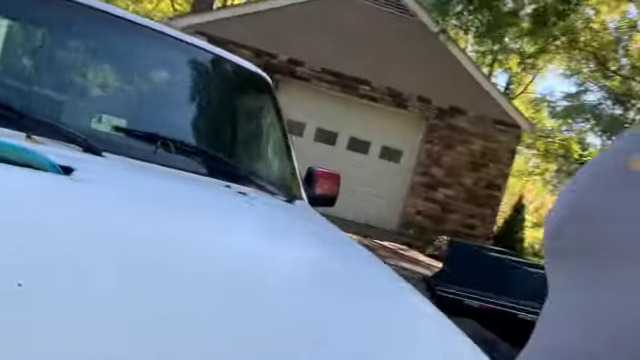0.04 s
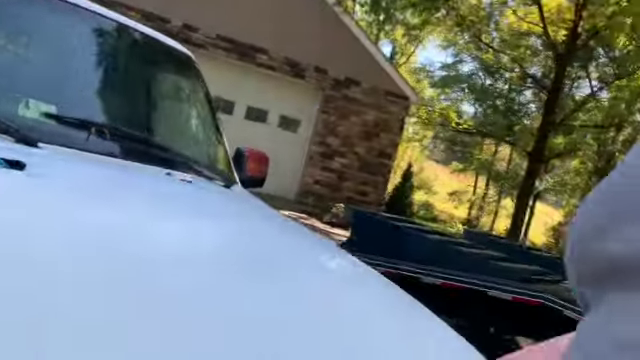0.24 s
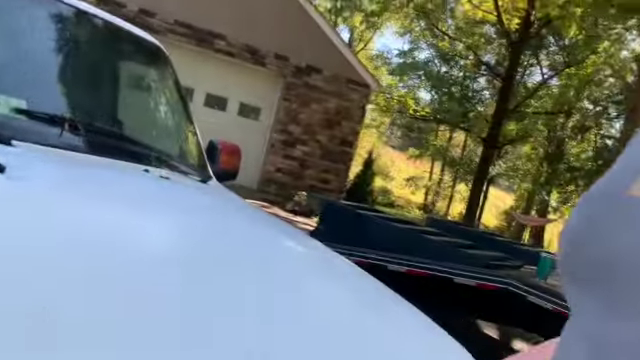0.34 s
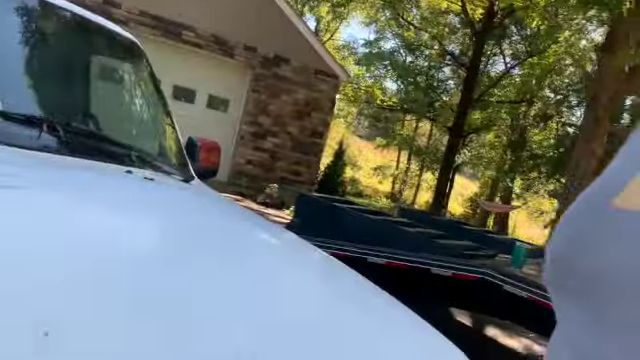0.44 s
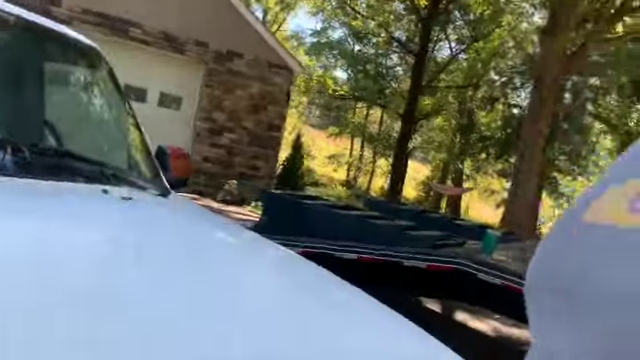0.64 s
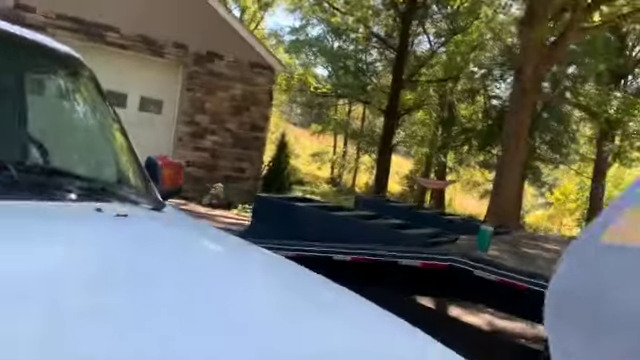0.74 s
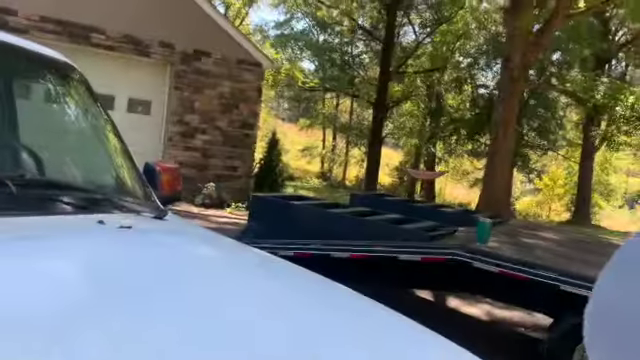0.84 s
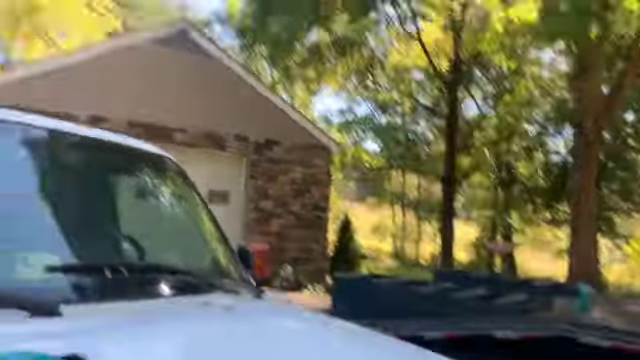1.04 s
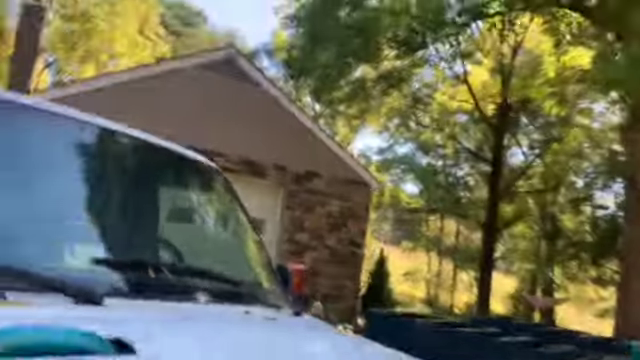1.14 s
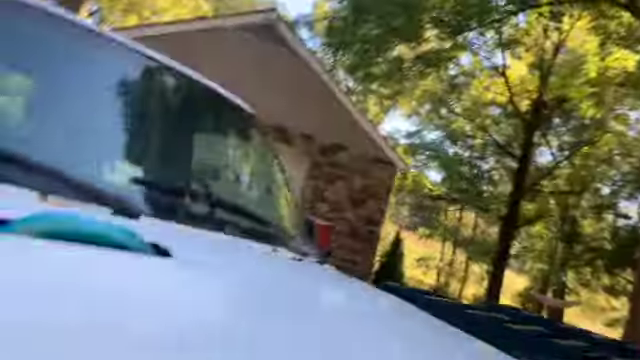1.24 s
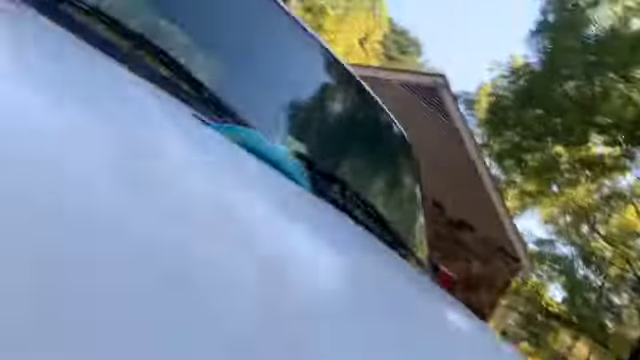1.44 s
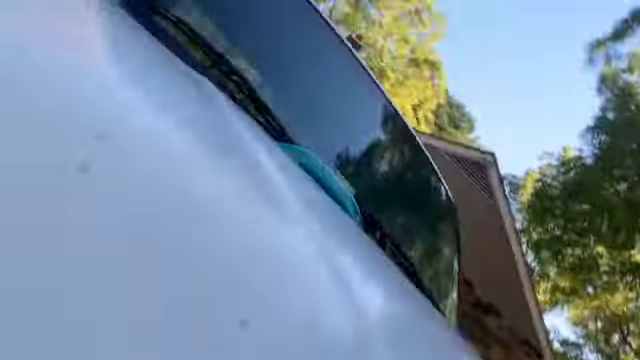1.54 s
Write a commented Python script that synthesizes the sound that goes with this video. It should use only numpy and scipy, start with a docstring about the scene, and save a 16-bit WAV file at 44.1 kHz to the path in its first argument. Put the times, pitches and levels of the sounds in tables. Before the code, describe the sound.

Close to the microphone on a driveway, a truck hood clunks open after a slight sleeve rustle. The safety catch clacks back, the rising panel judders, and its struts hiss faintly among a few soft knocks.

```python
"""A pickup's hood is unlatched and lifted on a driveway, an arm's length from the microphone.
A sleeve rustles among small ticks and handling rumble. The striker scrapes free of the latch in a run of
ringing blows, the hood jumps with a boom and the safety catch snaps back. The wide steel panel shudders
and buzzes as it starts to rise, then its gas struts hiss and whistle. Soft bumps follow, and near the
top of the swing the hinge begins to scrape."""
import sys
import numpy as np
from scipy.fft import rfft, irfft, next_fast_len
from scipy.io import wavfile
from scipy.ndimage import map_coordinates

SR = 44100
rng = np.random.default_rng(int(sys.argv[2]) if len(sys.argv) > 2 else 0)


def store_pcm(level_fs):
    """Save levels as 16-bit WAV."""
    pcm = np.round(np.clip(level_fs, -1, 1) * 32767).astype(np.int16)
    wavfile.write(sys.argv[1], SR, np.atleast_2d(pcm).T)


N = 70560
T = np.arange(N) / SR

# stereo image of all the noise (frequency [Hz], left-right likeness [0 to 1])
STEREO_LIKENESS = [(100, 0.88), (180, 1), (330, 0.31), (1000, 0.087), (2500, 0), (8000, 0)]
# outdoor air bed (frequency [Hz], relative level [dB])
AIR_COLOUR = [(30, 14), (200, -5.5), (600, -9.5), (1300, -14), (3000, -25), (9000, -29.5), (11500, -37),
              (14000, -38.5)]
# rumble of the handled hood (time [s], level [dB]) and (frequency [Hz], relative level [dB])
RUMBLE_LEVEL = [(0, -49), (.05, -61.5), (.11, -41.5), (.17, -39.5), (.205, -37), (.24, -31), (.35, -32.5),
                (.55, -36), (.7, -43), (.8, -48.5), (.92, -46.5), (1.02, -48.5), (1.09, -51.5), (1.19, -45),
                (1.28, -53.5), (1.38, -53), (1.5, -47.5), (1.6, -46)]
RUMBLE_COLOUR = [(20, -36), (40, -11.5), (65, 2.5), (100, -1.5), (135, -1), (175, -3.5), (220, -11.5),
                 (420, -16.5), (650, -25.5), (1300, -34), (2500, -43.5), (6000, -62)]
# sleeve rustle (time [s], level [dB]) and (frequency [Hz], relative level [dB])
SLEEVE_LEVEL = [(0, -66), (.06, -63.5), (.115, -58), (.17, -70), (.36, -58.5), (.41, -52.5), (.47, -71),
                (.93, -74.5), (1.01, -57), (1.07, -60), (1.17, -69), (1.25, -63.5), (1.32, -68.5),
                (1.37, -75.5), (1.6, -81)]
SLEEVE_COLOUR = [(300, -12), (1000, 3.5), (2500, 6), (4500, 4), (8500, 1.5), (10000, -7), (12000, -24.5)]
# small sharp ticks (time [s], level [dB], centre [Hz])
TICKS = [(0.018, -60, 7300), (.058, -47.5, 5030), (0.446, -54, 7830), (1.01, -53, 7400),
         (1.2334, -43.5, 6640), (1.318, -60, 6500), (1.555, -59, 5060)]
# booms of the whole panel (time [s], level [dB], pitch [Hz], t60 [s])
BOOMS = [(0.086, -27.5, 99.7, 0.16), (0.131, -32.5, 124, 0.14), (0.179, -22, 93, .045),
         (0.2542, -3.5, 101.1, 0.1), (0.2753, -14, 92.9, 0.18), (0.3062, -11.5, 96.7, 0.14),
         (.352, -25.5, 135, 0.26), (0.743, -36.5, 181, 0.16), (0.878, -28.5, 79, 0.076),
         (.912, -34, 92.7, 0.28), (1.005, -40, 84, 0.24), (1.152, -27.5, 87.6, .15),
         (1.165, -28, 58.6, 0.25), (1.275, -30, 76.7, 0.18), (1.48, -43.5, 107, 0.46)]
# the five points that shape the tone of a blow (frequency [Hz])
BLOW_BANDS_HZ = [300, 1500, 3500, 8000, 11000]
# the striker leaving the latch (time [s], then relative level [dB] at each of BLOW_BANDS_HZ)
STRIKER_BLOWS = [(.154, -34, -44, -59, -82, -91), (.209, -33, -26.5, -36.5, -48.5, -82),
                 (.232, -26, -22.5, -42.5, -54, -79), (.238, -24, -26.5, -32.5, -63, -70),
                 (.246, -35, -25.5, -41, -48.5, -73)]
# ring of the hood at the striker (frequency [Hz], relative level [dB], t60 [s])
HOOD_MODES = [(241, -2, 0.84), (356, 2, 0.18), (400.4, 0, 0.42), (518, -10, 0.35), (606, -11, 0.33),
              (751, -11.5, 0.52), (859.4, -5.5, 0.26), (1044, -10.5, 0.65), (1238, -14, 0.57),
              (1576, -28, 0.13), (1770, -8.5, 0.17), (2372, -5.5, .16), (2507, -11, 0.23),
              (2800, -6.5, 0.21), (3864, -12, 0.32), (4080, -1.5, 0.067)]
# dense clatter between the modes (frequency [Hz], relative level [dB]) and (frequency [Hz], t60 [s])
CLATTER_BANDS = [(175, -7.5), (300, -3.5), (620, -10), (1000, -6.5), (1500, -5), (2300, -3), (3300, -4),
                 (5000, -2), (8500, 4), (11000, -2.5)]
CLATTER_DECAY = [(200, 0.3), (1300, 0.27), (3500, 0.14), (8000, 0.084)]
# the safety catch snapping back (time [s], then relative level [dB] at each of BLOW_BANDS_HZ)
CATCH_BLOWS = [(.3275, -24.5, -26, -37.5, -41, -45), (.330, -29.5, -25, -47.5, -54, -62),
               (.349, -29, -36, -70, -76, -65)]
# ring of the catch (frequency [Hz], relative level [dB], t60 [s])
CATCH_MODES = [(325, -3.5, 0.36), (522, -8.5, 0.75), (645.7, -12, 0.17), (772, -8, 0.06), (844.5, -9.5, .2),
               (889, -4, 0.12), (1039, -15.5, 0.54), (1181, -3.5, .25), (1320, -9, 0.34), (1330, 1, 0.15),
               (1432, -0.5, 0.12), (1602, 3, 0.062), (1783, 1, 0.079), (2240, 5, 0.11), (2830, -7, 0.093),
               (6590, -11, 0.33)]
# soft knocks of latch, hinge and hands (time [s], level [dB], pitch [Hz])
KNOCKS = [(.3492, -18, 771), (0.802, -73, 258), (0.886, -41, 385), (0.923, -46.5, 1050), (.93, -44.5, 383),
          (0.994, -38.5, 413), (1.014, -37.5, 393), (1.149, -38.5, 330), (1.167, -34, 233),
          (1.188, -36.5, 200), (1.222, -46, 430)]
# shudder of the rising hood (time [s], level [dB])
SHUDDER_LEVEL = [(.38, -63), (.40, -34), (.445, -26.5), (.475, -24), (.51, -19), (.57, -18.5), (.61, -26.5),
                 (.65, -31), (.72, -40.5), (.8, -49), (.9, -60)]
# higher panel modes that the shudder shakes (frequency [Hz], level against the lowest mode [dB])
PANEL_MODES = [(175, -11), (240, -27), (266, -29.5), (316, -30), (360, -31), (398, -38), (436, -34),
               (524, -34)]
# loose metal buzzing on the panel (time [s], level [dB]) and (frequency [Hz], relative level [dB])
BUZZ_LEVEL = [(.38, -67), (.44, -59.5), (.48, -40), (.515, -37), (.55, -42), (.59, -55.5), (.68, -77),
              (.8, -62)]
BUZZ_COLOUR = [(150, -11), (300, 5), (520, -7.5), (720, -9.5), (1100, -4.5), (1350, -3), (1530, -4.5),
               (1800, -14), (2500, -22), (2950, -17), (3500, -26.5), (6000, -39), (11000, -59.5)]
# hiss of the gas struts, and their thin high jet (frequency [Hz], relative level [dB])
HISS_COLOUR = [(200, -28), (700, -12), (1300, 5), (2000, 3), (2900, 2.5), (3350, 0), (3800, 8),
               (4150, 12.5), (4700, 1.5), (5500, -2), (7300, -12), (10000, -48)]
JET_COLOUR = [(7000, -52), (7900, -22.5), (8100, 1), (8700, -5.5), (9600, -13), (11000, -21.5)]
# strut whistles (start [s], end [s], first pitch [Hz], last pitch [Hz], level [dB], roughness [rad])
WHISTLES = [(0.584, 0.723, 2496, 2374, -61, 0.22), (0.768, 0.87, 2370, 2320, -64, 0.64)]
# hinge scrape (frequency [Hz], relative level [dB])
HINGE_COLOUR = [(150, -10), (400, 6), (1000, 10.5), (2000, -5), (3000, -12), (8000, -16), (11000, -42)]
# top end of the microphone (frequency [Hz], gain [dB])
MICROPHONE_EQ = [(9000, 1), (10000, 0), (11300, -3), (12300, -16.5), (14500, -17)]

BLOW_ATTACK_S = 0.00091


def amp(db):
    """Decibels to gain."""
    return 10 ** (np.asarray(db) / 20)


def unit(x):
    """Scale to rms 1."""
    return x / np.sqrt(np.mean(x ** 2) + 1e-20)


def along(points, hz):
    """Read a (frequency [Hz], value) curve on a log frequency axis."""
    freqs, values = np.transpose(points)
    return np.interp(np.log(hz + 1), np.log(freqs + 1), values)


def fader(rows):
    """Gain per sample from (time [s], level [dB]) rows."""
    return amp(np.interp(T, *np.transpose(rows)))


def wobble(rate):
    """A smooth random curve, rate knots a second."""
    return map_coordinates(rng.standard_normal(int(N * rate / SR) + 4), [T * rate])


def filtered(x, response):
    """Equalise x with a gain that depends on frequency."""
    size = next_fast_len(N + SR // 4)
    return irfft(rfft(x, size) * response(np.fft.rfftfreq(size, 1 / SR)), size)[..., :N]


def noise(gain):
    """Stereo noise of rms 1: centred in the bass, wide in the treble."""
    def mid_side_gain(hz):
        width = np.arccos(np.clip(along(STEREO_LIKENESS, hz), -1, 1)) / 2
        return gain(hz) * np.array([np.cos(width), np.sin(width)])
    mid, side = filtered(rng.standard_normal((2, N)), mid_side_gain)
    return unit(np.array([mid + side, mid - side]))


def rush(colour):
    """Noise shaped by (frequency [Hz], relative level [dB]) rows."""
    return noise(lambda hz: amp(along(colour, hz)))


def band(centre_hz, octaves):
    """Noise around one frequency."""
    return noise(lambda hz: np.exp(-.5 * (np.log2((hz + 1) / centre_hz) / octaves) ** 2))


def struck(start, attack, t60):
    """Envelope of a hit: a fast rise, then 60 dB of decay in t60 seconds."""
    age = np.maximum(T - start, 0)
    return (1 - np.exp(-age / attack)) * np.exp(-np.log(1000) * age / t60)


def thump(start, hz, attack, t60):
    """One struck, decaying sine."""
    return struck(start, attack, t60) * np.sin(2 * np.pi * hz * (T - start))


def held(start, end, fade):
    """Envelope that fades in at start and out at end."""
    return np.clip((T - start) / fade + .5, 0, 1) * np.clip((end - T) / fade + .5, 0, 1)


def engine_bay(x, ripple_db=3, width_hz=45):
    """The bay colours a sound with many narrow resonances, partly different at each ear; rms 1 out."""
    def peaks(hz):
        return np.array([map_coordinates(rng.standard_normal(4096), [hz / width_hz]) for ear in range(2)])

    def response(hz):
        shared, per_ear = peaks(hz)[0], peaks(hz)
        return amp(ripple_db * np.minimum(hz / 800, 1) * (shared + .5 * per_ear))
    return unit(filtered(x, response))


def outdoor_air(db=-66):
    """A quiet, steady bed of open air."""
    return amp(db) * rush(AIR_COLOUR)


def rumble():
    """The panel rumbles as it is handled and lifted."""
    return fader(RUMBLE_LEVEL) * engine_bay(rush(RUMBLE_COLOUR))


def sleeve():
    """Cloth rustles in swells with a fine, fast grain."""
    grain = unit(amp(2.2 * wobble(400)))
    return fader(SLEEVE_LEVEL) * grain * engine_bay(rush(SLEEVE_COLOUR))


def ticks():
    """Tiny hard contacts, each a bright pinch of noise."""
    return sum(amp(db) * struck(start, attack=0.00016, t60=0.015) * band(hz, octaves=0.26)
               for start, db, hz in TICKS)


def booms():
    """The whole panel booms in its lowest modes, loudest as the hood jumps."""
    return sum(amp(db) * thump(start, hz, attack=.005, t60=t60) for start, db, hz, t60 in BOOMS)


def struck_steel(blows, modes, ring_db, clatter_db, spread_rad=0.48, wander_rad=.75, crack_db=-7):
    """Each blow rings the steel's modes, with a crack and a clatter that dies sooner in the treble."""
    def envelope(hz, t60):
        hits = [amp(along(list(zip(BLOW_BANDS_HZ, dbs)), hz)) * struck(start, BLOW_ATTACK_S, t60)
                for start, *dbs in blows]
        return np.linalg.norm(hits, axis=0)  # overlapping blows add in power

    out = np.zeros((2, N))
    for hz, db, t60 in modes:
        ear_phase = spread_rad * rng.choice([-1, 1]) * np.array([[1], [-1]]) * min(hz / 500, 1)
        phase = 2 * np.pi * (hz * T + rng.random()) + wander_rad * wobble(60.56)
        out += amp(ring_db + db) * envelope(hz, t60) * np.sin(phase + ear_phase)
    for hz, db in CLATTER_BANDS:
        crack = amp(crack_db) * envelope(hz, t60=.03)
        tail = envelope(hz, along(CLATTER_DECAY, hz))
        out += amp(clatter_db + db) * (crack + tail) * engine_bay(band(hz, octaves=0.4))
    return out


def latch():
    """The striker clunks out of the latch and sets the hood ringing."""
    return struck_steel(STRIKER_BLOWS, HOOD_MODES, ring_db=-5.5, clatter_db=-6)


def safety_catch():
    """The catch snaps back with a bright steel clack."""
    return struck_steel(CATCH_BLOWS, CATCH_MODES, ring_db=-6, clatter_db=-5)


def knocks():
    """Latch, hinge and hands give short, dull knocks."""
    return sum(amp(db) * thump(start, hz, BLOW_ATTACK_S, t60=0.03) for start, db, hz in KNOCKS)


def shudder(pitch_hz=92, pitch_wander=0.016, drift_rad=0.67, buzz_depth=.45):
    """The hood judders at its lowest mode and shakes the higher ones; loose metal buzzes once a cycle."""
    phase = 2 * np.pi * np.cumsum(pitch_hz * (1 + pitch_wander * wobble(25))) / SR
    panel = np.sin(phase)
    for hz, db in PANEL_MODES:
        width = min(hz / 500, 1) ** 2  # higher modes sit wider in the stereo image
        drift = drift_rad * (wobble(25) + width * np.array([wobble(25), wobble(25)]))
        panel = panel + amp(db) * np.sin(2 * np.pi * (hz * T + rng.random()) + drift)
    contact = unit(np.exp(buzz_depth * np.sin(phase)))
    buzz = fader(BUZZ_LEVEL) * contact * engine_bay(rush(BUZZ_COLOUR))
    return fader(SHUDDER_LEVEL) * unit(panel) + buzz


def gas_struts(start_s=0.55, fade_s=0.075, hiss_db=-61.5, jet_db=-71):
    """Gas squeezes through the extending struts: a hiss, a jet on the right, thin sinking whistles."""
    hiss = amp(hiss_db) * held(start_s, end=1.098, fade=fade_s) * rush(HISS_COLOUR)
    jet = amp(jet_db) * held(start_s, end=0.93, fade=fade_s) * rush(JET_COLOUR)
    pan_right = np.array([[.1], [1.4]])
    out = hiss + pan_right * jet
    for start, end, from_hz, to_hz, db, roughness in WHISTLES:
        phase = 2 * np.pi * np.cumsum(np.interp(T, [start, end], [from_hz, to_hz])) / SR
        out += amp(db) * held(start, end, fade=0.012) * np.sin(phase + roughness * wobble(120))
    return out


def hinge(start_s=1.505, rise_s=0.049, db=-58.5):
    """The hinge scrapes with an uneven grip near the top of the swing."""
    grip = amp(5.3 * wobble(90))
    fade_in = np.clip((T - start_s) / rise_s + .5, 0, 1)
    return amp(db) * grip * fade_in * engine_bay(rush(HINGE_COLOUR))


def scene():
    """Handling, release and lift, mixed over the outdoor air."""
    handling = rumble() + sleeve() + ticks() + booms()
    release = latch() + safety_catch()
    lift = knocks() + shudder() + gas_struts() + hinge()
    return outdoor_air() + handling + release + lift


def record(dry, top_hz=14700):
    """The microphone rolls off the top octave and keeps nothing above its band limit."""
    return filtered(dry, lambda hz: amp(along(MICROPHONE_EQ, hz)) * (hz < top_hz))


dry = scene()
out = record(dry)
store_pcm(out)
```